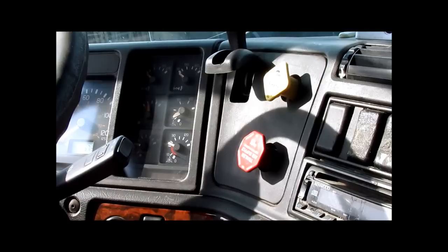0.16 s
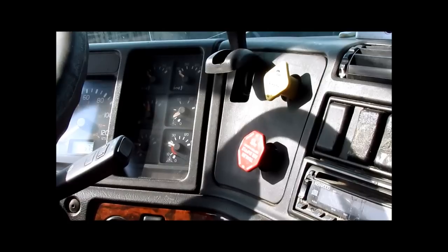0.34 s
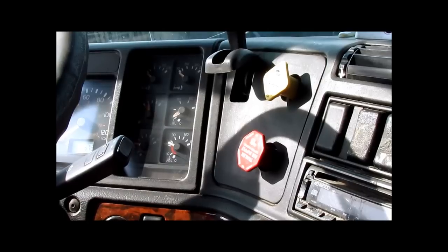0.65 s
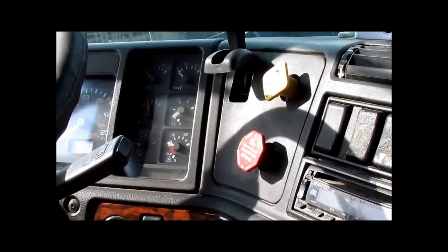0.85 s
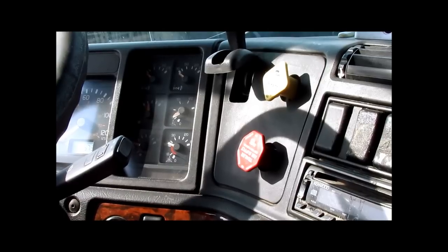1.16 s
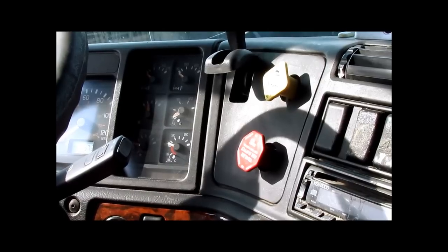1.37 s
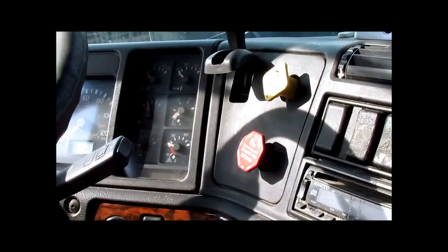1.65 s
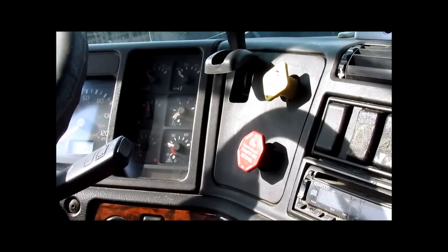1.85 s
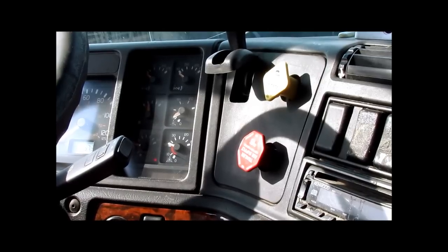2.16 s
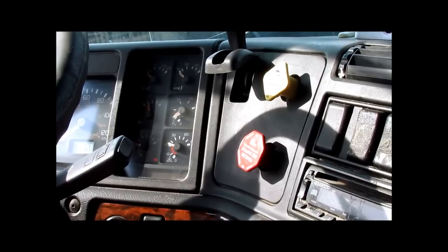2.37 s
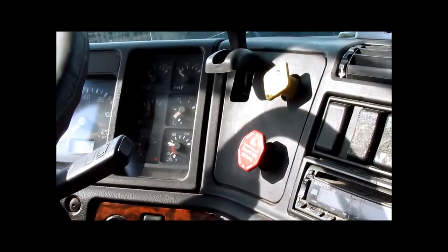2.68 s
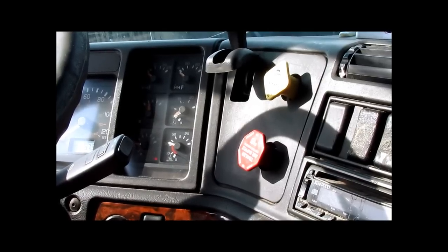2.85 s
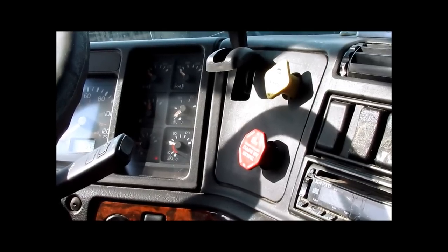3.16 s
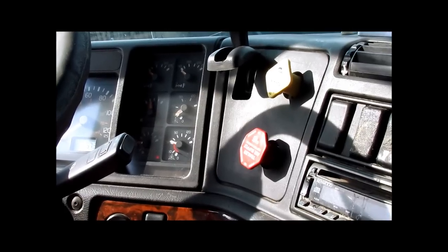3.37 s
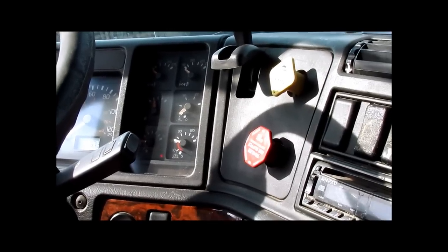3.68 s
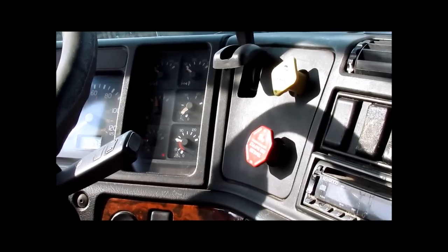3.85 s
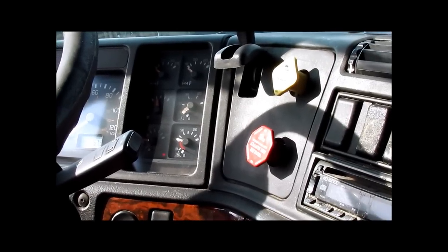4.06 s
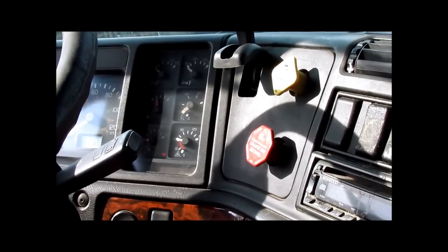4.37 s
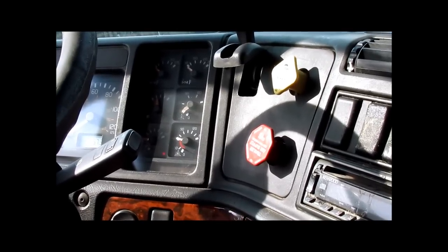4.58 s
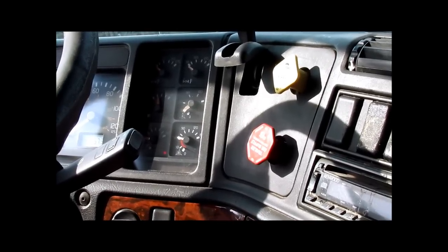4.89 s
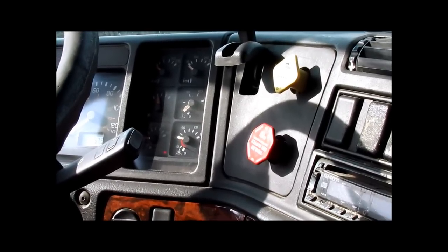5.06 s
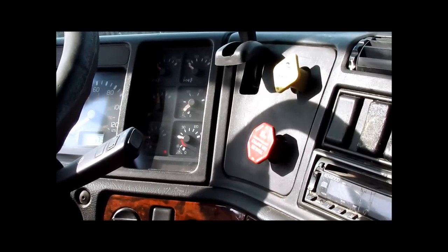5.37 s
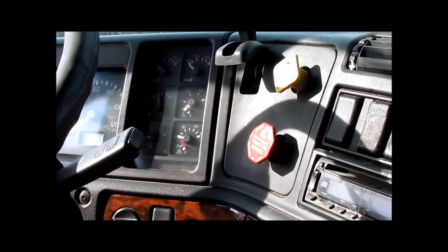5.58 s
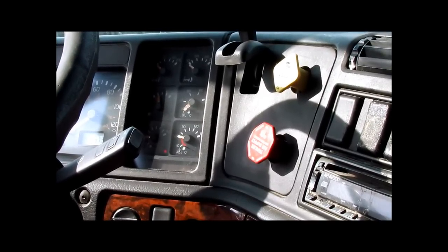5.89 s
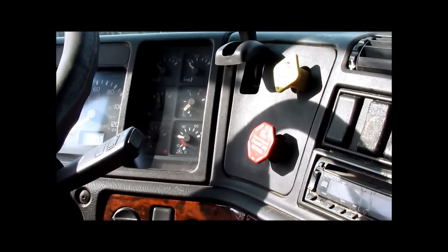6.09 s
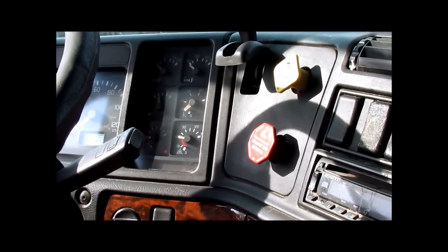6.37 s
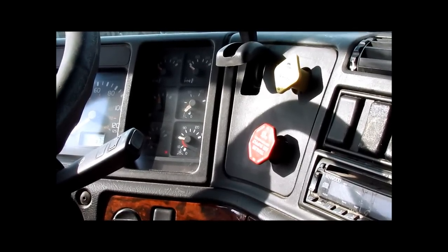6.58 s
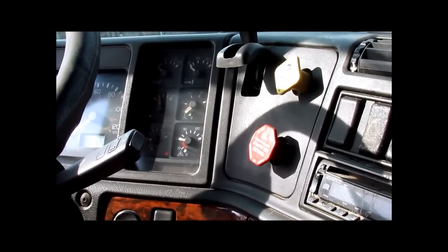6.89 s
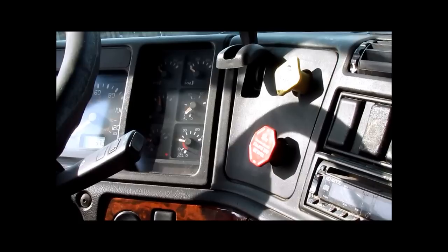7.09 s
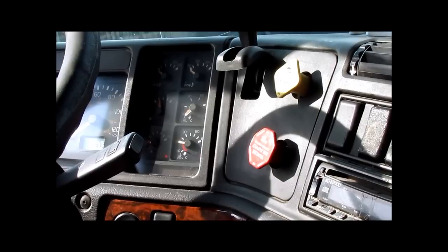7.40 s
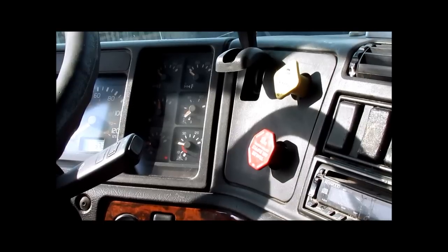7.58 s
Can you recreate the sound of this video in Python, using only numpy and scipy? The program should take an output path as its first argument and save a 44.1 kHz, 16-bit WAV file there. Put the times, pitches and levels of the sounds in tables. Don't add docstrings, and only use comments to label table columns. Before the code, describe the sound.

A constant jet of escaping air fills a small vehicle cabin, coloured by its resonances and slowly losing strength and treble. A fluttering, high edge whistle shifts between left and right, strongest around the middle, then fades into air. Muffled street rumble and faint passing engine hums lie far below. One brief, woody seat creak occurs after the halfway point. Hand-held stereo pickup.

```python
import sys
import numpy as np
from scipy import signal
from scipy.fft import rfft, irfft, next_fast_len
from scipy.io import wavfile
from scipy.ndimage import uniform_filter1d, map_coordinates

SR = 44100
rng = np.random.default_rng(int(sys.argv[2]) if len(sys.argv) > 2 else 0)


def pcm_store(signal):
    levels = np.round(np.clip(np.atleast_2d(signal), -1, 1) * 32767)
    wavfile.write(sys.argv[1], SR, levels.astype(np.int16).T)


def boost_factor(decibels):
    exponent = np.asarray(decibels, float) / 20
    return 10 ** exponent


N = 341334


def unit(x):
    return x / np.sqrt(np.mean(x ** 2) + 1e-20)


def along(points, hz):
    f, *cols = np.transpose(points)
    return np.array([np.interp(np.log(hz + 1), np.log(f + 1), c) for c in cols])


def curves(rows):
    s, *cols = np.transpose(rows)
    return [np.interp(np.arange(N) / SR, s, c) for c in cols]


def swells(rows):
    t = np.arange(N) / SR
    return sum(boost_factor(np.array(db)[:, None]) * np.exp(-((t - s) / half) ** 2) for s, half, *db in rows)


def smooth_chance(where):
    return map_coordinates(rng.standard_normal(int(np.max(where)) + 4), [where])


def wobble(rate):
    return smooth_chance(np.arange(N) * rate / SR)


def blur(rate):
    return unit(wobble(rate)) + 1j * unit(wobble(rate))


def filtered(x, response):
    m = next_fast_len(N + 8192)
    return irfft(rfft(x, m) * response(np.fft.rfftfreq(m, 1 / SR)), m)[..., :N]


def ports(likeness):
    shared, own = rng.standard_normal((2, N))
    k = likeness(np.fft.rfftfreq(next_fast_len(N + 8192), 1 / SR))
    k = k / np.maximum(abs(k), 1)
    right = filtered(shared, lambda hz: np.conj(k))
    right = right + filtered(own, lambda hz: np.sqrt(abs(1 - abs(k) ** 2)))
    return np.array([shared, right])


def street():
    # f/Hz, level per Hz/dB
    traffic = [(12, -40), (20, -10.5), (62, 1), (100, -8), (165, -7), (308, -14), (382, -12.5), (500, -18),
               (650, -28), (1100, -120)]
    # centre t/s, half length/s, level/dB
    engine = [
        (.5, 0.33, -39),
        (1.3, 0.36, -42.5),
        (1.68, 0.065, -39),
        (2.1, 0.26, -42),
        (2.9, 0.1, -43),
        (4.6, 2.1, -49),
        (6.65, .45, -42),
        (7.5, 0.42, -37),
    ]
    rumble = filtered(ports(lambda hz: 0.83 * np.exp(-.2j + 0 * hz)), lambda hz: boost_factor(along(traffic, hz)))
    engine_hz, traffic_db = 64.4, -42.5
    phase = 2 * np.pi * np.cumsum(engine_hz + 1.17 * wobble(7)) / SR
    drone = np.sqrt(2) * swells(engine) * boost_factor(0.87 * wobble(12)) * np.sin(phase)
    return boost_factor(traffic_db + 1.1 * wobble(4.21)) * unit(rumble) + drone


def hums():
    # centre t/s, half length/s, level/dB, f/Hz
    passing = [
        (.9, .5, -52, 161),
        (1.4, .35, -51, 110),
        (2.8, .7, -52, 110),
        (5.3, .7, -53, 154),
        (6.6, .4, -53, 195),
        (7.5, .2, -50, 130),
        (.8, .9, -51, 82),
        (4.5, 1.2, -52, 89),
    ]
    t = np.arange(N) / SR
    total = 0
    for *swell, hz in passing:
        line = boost_factor(2.5 * wobble(6)) * np.sin(2 * np.pi * hz * t + 1.2 * wobble(4))
        total = total + np.sqrt(2) * swells([swell]) * line
    return total


def creak():
    # f/Hz, width/Hz, level/dB
    seat_frame = [(263, 100, -4.5), (394, 68, 2), (633, 104, -3.5), (770, 110, -8), (980, 95, -19)]
    t = np.arange(N) / SR
    start_s, rise_s, slide_s, dying_s = 4.844, .011, .03, .012
    creak_db, sag_db, slips_hz = -27.5, 5.5, 201
    scrape_db, settle_s = -11, .3
    stages = start_s + np.cumsum([0, rise_s, slide_s, dying_s])
    db = creak_db - np.interp(t, stages, [30, 0, sag_db, 30])
    slip_count = np.floor(np.cumsum(slips_hz * (1 + .06 * wobble(150))) / SR)
    slips = np.diff(slip_count, prepend=0)
    push = boost_factor(db + 44.5) * (db > db.min()) * slips * boost_factor(2.4 * wobble(200))
    since = np.clip(t - start_s, 0, None)
    scrape_gain = boost_factor(scrape_db - 60 * since / settle_s) * np.minimum(since / rise_s, 1)
    scrape = scrape_gain * rng.standard_normal(N)

    def ringing(f):
        total = 0
        for k, (centre, w, db) in enumerate(seat_frame):
            total = total + (-1) ** k * boost_factor(db) * 1j * f * w / (centre * centre - f * f + 1j * f * w)
        return total

    rustle = boost_factor(-21) * filtered(scrape, lambda f: f / (f + 900))
    return filtered(push + scrape, ringing) * boost_factor([[-.7], [.7]]) * 1 + rustle


def cab_field(hz):
    # f/Hz, left level/dB, right level/dB
    colour = [(600, -15.5, -14), (1300, -13.5, -10.5), (2100, -11.5, -4.5), (3170, -7, -3.5),
              (3380, -11.5, -6.5), (4300, -12.5, -13.5), (5400, -16, -12.5), (6200, -11.5, -9),
              (7500, -15, -12), (8900, -10.5, -6.5), (9900, -16.5, -14), (10900, -16.5, -14.5),
              (11600, -10, -7.5), (14200, -20.5, -19)]
    # f/Hz, likeness (0-1), left leads by/rad
    scattered = [(304, 0.85, -0.26), (860, 0.92, 1.2), (1330, 0.45, -1.5), (3500, 0.38, 1.9),
                 (5160, 0.52, -0.06), (6800, 0.5, 1), (7440, 0, 1.5), (8500, 0.9, -4), (10800, 0.43, -4),
                 (13800, 0.6, -4.5)]
    # f/Hz, width/Hz, left
    # level/dB, right level/dB, left leads by/rad
    cab_waves = [(536, 29, -12, -11, -.1), (724, 25, -13, -13, -.1), (770, 40, -9, -6, -.4),
                 (874, 40, -8, -6, -.2), (966, 70, -10, -6, .2), (1098, 64, .5, 1.5, -.1),
                 (1186, 37, -4, -1, -.4), (1267, 31, -5, -7, .9), (1355, 129, -8, -4, .1),
                 (1476, 41, -2, -7, 2.8), (1516, 40, -1, 0, .2), (1664, 55, -1, 2.5, -.6),
                 (1803, 129, -5, -22, -.1),
                 (1940, 110, -3, 2.5, -2.6), (2066, 61, -11, 7, .1), (2125, 69, -2, 7, .3),
                    (2260, 43, -14, 6, 1), (2370, 45, -1, 2, -.5), (2498, 39, -8, 1, -.7),
                    (2614, 32, -3, 5, -2.1), (2690, 129, -2.5, 1, -2.9), (2765, 60, -35, 1, 1.3),
                    (2953, 26, -8, -2, 0), (3053, 66, -5, -3, -1.2), (3571, 45, -16, -5, -1.6),
                    (3800, 190, -22, -7, -2), (4024, 57, -18, -7, -.4)]
    # f/Hz, likeness (0-1)
    waves_alike = [(1100, 0.96), (2100, 0.49), (4000, 1)]
    power = boost_factor(along(colour, hz)) ** 2
    alike, lead = along(scattered, hz)
    crowded = np.clip((hz - 2600) / 900, 0, 1)
    wander = (1 + 0.52 * crowded * smooth_chance(hz / 60)) * np.exp(.8j * crowded * smooth_chance(hz / 90))
    cross = np.sqrt(power.prod(0)) * alike * np.exp(1j * lead) * wander
    for centre, width, left_db, right_db, wave_lead in cab_waves:
        wave = boost_factor([[left_db], [right_db]]) ** 2 / (1 + (2 * (hz - centre) / width) ** 2) ** 2
        power = power + wave
        cross = cross + np.sqrt(wave.prod(0)) * along(waves_alike, centre)[0] * np.exp(1j * wave_lead)
    ripple = .6 * smooth_chance(hz / 70) + .8 * np.array([smooth_chance(hz / 45), smooth_chance(hz / 45)])
    fine = smooth_chance(hz / 22) + np.array([smooth_chance(hz / 22), smooth_chance(hz / 22)])
    depth_db = 1.5 * crowded * ripple + .9 * fine
    edges = (hz / 260) ** 3 / (1 + (hz / 260) ** 3) / (1 + (hz / 15000) ** 30)
    return np.sqrt(power) * boost_factor(depth_db) * edges, cross / np.sqrt(power.prod(0))


def hiss():
    t = np.arange(N) / SR
    body_db = -27.5 - .5 * t
    treble_db = 0.37 - 0.33 * t
    gain, likeness = cab_field(np.fft.rfftfreq(next_fast_len(N + 8192), 1 / SR))
    air = unit(filtered(ports(lambda hz: likeness), lambda hz: gain))
    treble = filtered(air, lambda hz: 1 / (1 + (4300 / (hz + 1)) ** 8))
    flow_db = .15 * wobble(3) + .2 * wobble(11)
    breathy = unit(filtered(air, lambda hz: 1 / (1 + ((hz - 6390) / 70) ** 2)))
    waking_db = -33 + 12 / (1 + np.exp((5 - t) / .8))
    body = air - treble
    jet = body + boost_factor(treble_db + .3 * wobble(6.4)) * treble + boost_factor(waking_db) * breathy
    return boost_factor(body_db + 4.0 + flow_db) * jet


def whistle():
    # t/s, left level/dB, right level/dB, left leads by/rad
    edge_tone = [(0, -35, -28, 1.7), (.45, -30, -24.5, 6.1), (.78, -35, -22, 4.1), (1.06, -29.5, -33, 4.4),
                 (1.3, -31, -24, 4.9), (1.7, -28.5, -25.5, 3.6), (2.35, -38, -33.5, 4.3),
                 (2.6, -29, -33.5, 4.5), (3.15, -28.5, -30, 5.25), (3.3, -25, -28.5, 5.8),
                 (3.9, -23, -25, 6.4), (4.3, -25.5, -28, 5.34), (4.95, -25, -30, 5.2),
                 (5.4, -24, -34.5, 4.9), (5.6, -30.5, -44, 6.5), (6.5, -28, -35, 8),
                 (6.95, -33, -30.5, 8.35), (7.45, -39, -46, 8.3)]
    # centre t/s, half length/s, left level/dB, right level/dB
    octave_spells = [
        (.15, .25, -50, -40),
        (.95, 0.6, -42, -44),
        (4.5, 1, -45, -41.5),
        (6.4, 0.97, -48, -44.5),
    ]
    t = np.arange(N) / SR
    left_db, right_db, lead = curves(edge_tone)
    rest_hz, sink_hz, sink_s = 6925, 137, 3.3
    hz = rest_hz + sink_hz * np.exp(-(t / sink_s) ** 1.2)
    loose = np.clip((-23 - np.maximum(left_db, right_db)) / 34, .02, .4)
    loose = np.maximum(loose, np.interp(t, [6.45, 7.1], [0, 1]))
    flicker = np.sqrt(1 - loose) + np.sqrt(loose / 2) * (.8 * blur(45) + .6 * blur(110))
    phase = 2 * np.pi * np.cumsum(hz + 1.2 * wobble(12)) / SR
    steady = .9 + .22 * blur(50)
    drift = boost_factor(.5 * np.array([wobble(12), wobble(12)]))
    tone = boost_factor([left_db, right_db]) * flicker * np.exp(1j * np.array([phase + lead, phase]))
    octave = swells(octave_spells) * steady * np.exp(1j * np.array([2 * phase + 1.85, 2 * phase]))
    return np.sqrt(2) * drift * (tone + boost_factor(3.0) * octave).real


def scene():
    return hiss() + whistle() + street() + creak() + hums()


def join_treble(x):
    # from t/s, to t/s
    joined = [
        (0, .62),
        (.99, 1.32),
        (4.85, 4.93),
        (5.71, 5.85),
        (6.03, 6.12),
    ]
    hz, t, z = signal.stft(x, SR, nperseg=2048)
    band = (hz // 340).astype(int)

    def in_band(p):
        return (np.eye(band[-1] + 1)[band].T @ p)[band] + 1e-20

    left, right, mid = in_band(abs(z[0]) ** 2), in_band(abs(z[1]) ** 2), z.mean(0)
    patches = uniform_filter1d(rng.standard_normal((band[-1] + 1, len(t))), size=5, axis=1)[band]
    when = sum((t > a) & (t < b) for a, b in joined) > 0
    balanced = abs(np.log10(left / right)) < .5
    chosen = patches > -.6 + .45 * (hz[:, None] > 6700)
    join = when & balanced & (hz[:, None] > 4700) & chosen
    both = mid * np.sqrt((left + right) / 2 / in_band(abs(mid) ** 2))
    return signal.istft(np.where(join, both, z), SR, nperseg=2048)[1][:, :N]


def roll_off(x):
    return signal.sosfilt(signal.butter(12, 15270, fs=SR, output="sos"), x)


def record(dry):
    mix = join_treble(dry)
    return roll_off(mix)


dry = scene()
out = record(dry)
pcm_store(out)
```